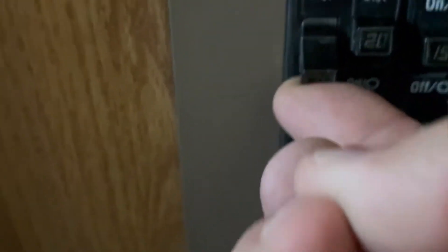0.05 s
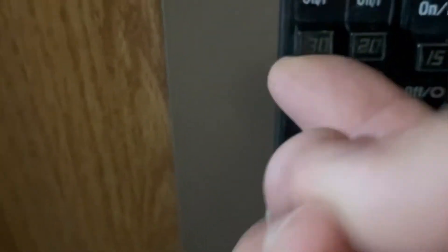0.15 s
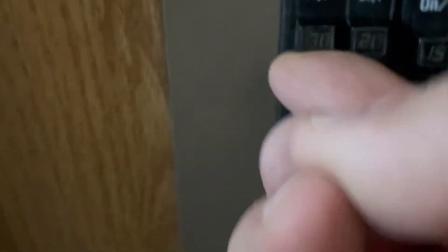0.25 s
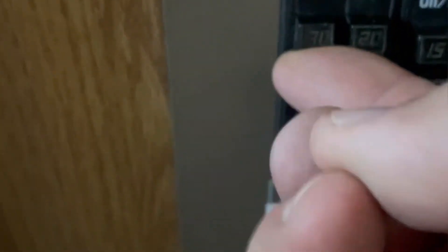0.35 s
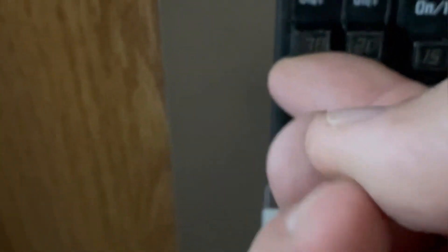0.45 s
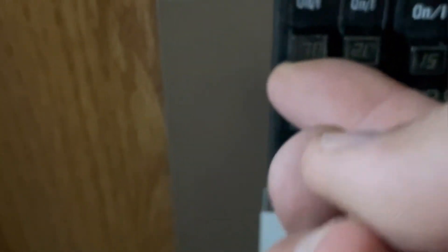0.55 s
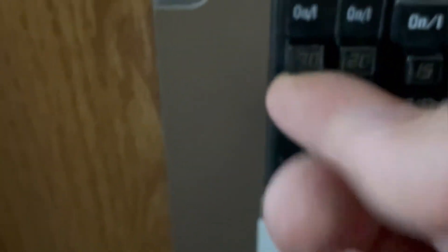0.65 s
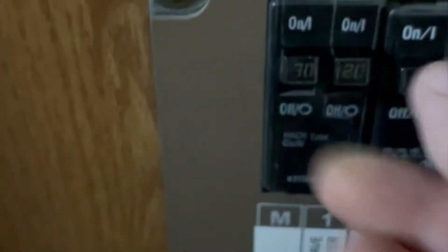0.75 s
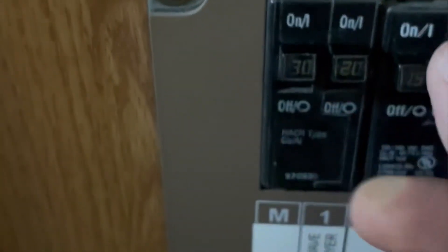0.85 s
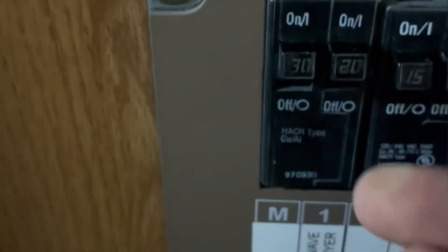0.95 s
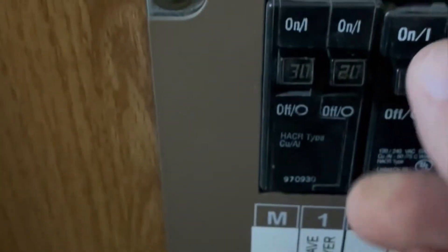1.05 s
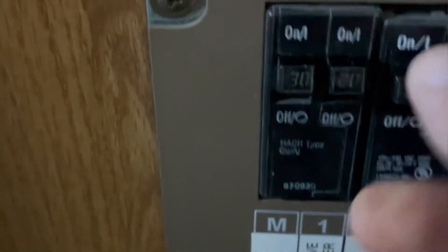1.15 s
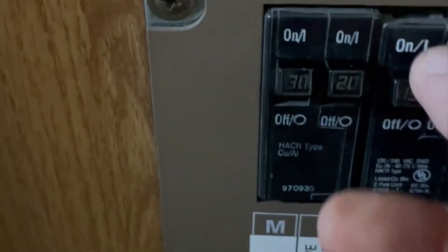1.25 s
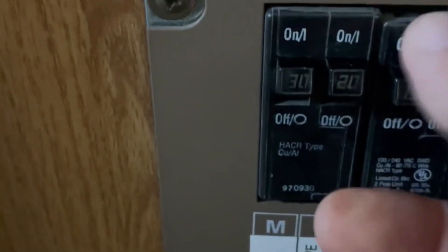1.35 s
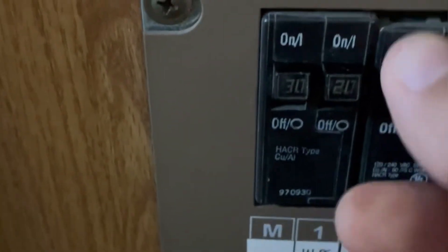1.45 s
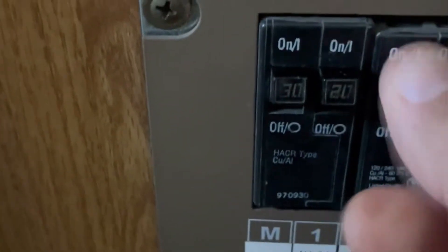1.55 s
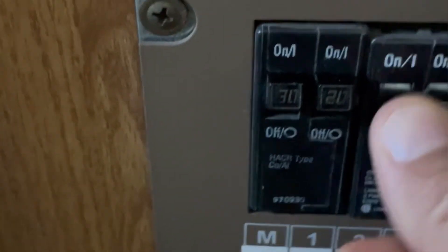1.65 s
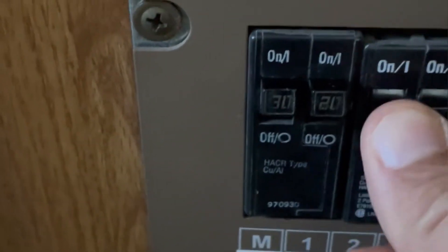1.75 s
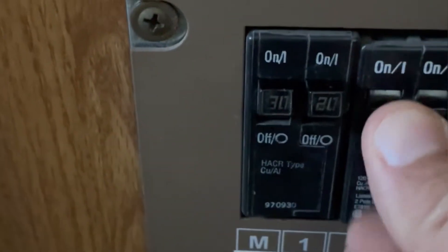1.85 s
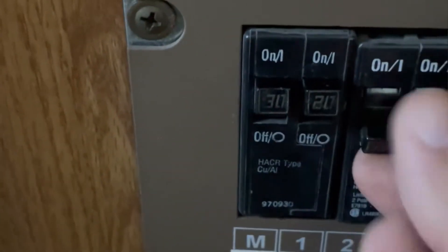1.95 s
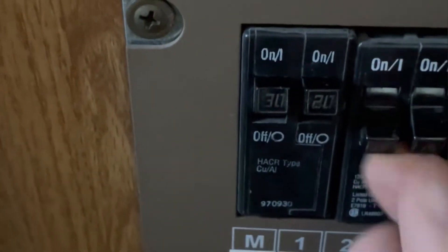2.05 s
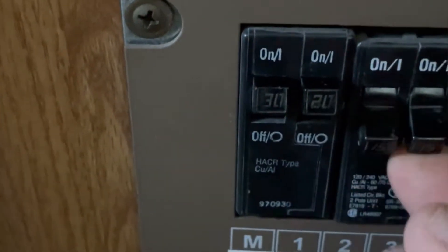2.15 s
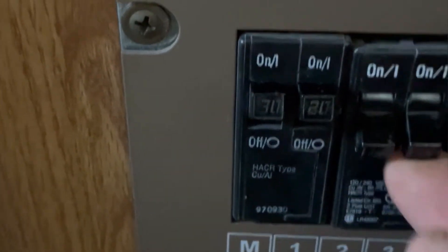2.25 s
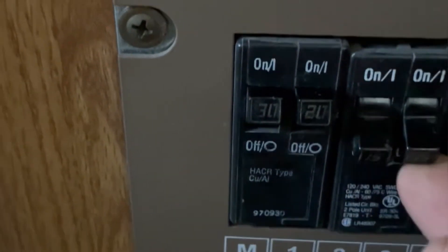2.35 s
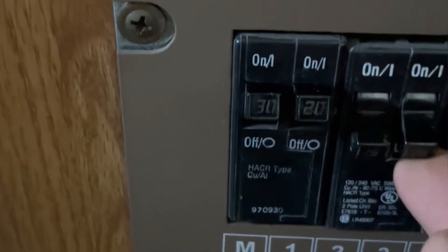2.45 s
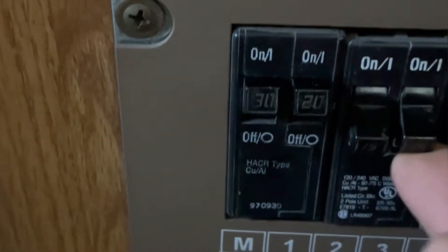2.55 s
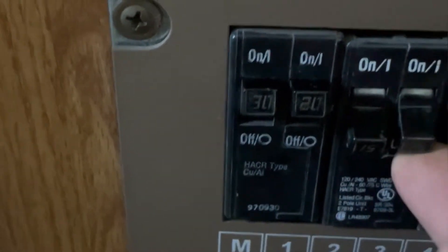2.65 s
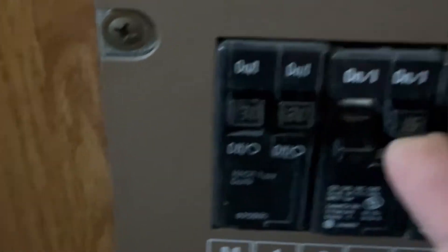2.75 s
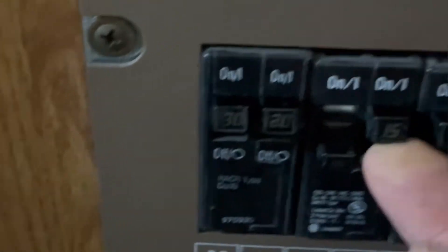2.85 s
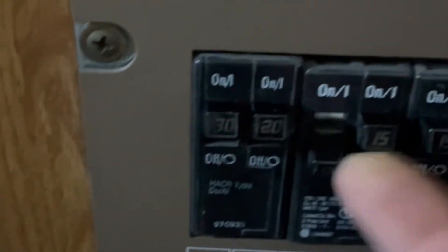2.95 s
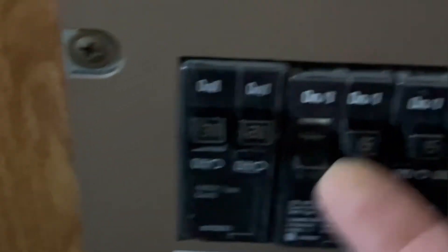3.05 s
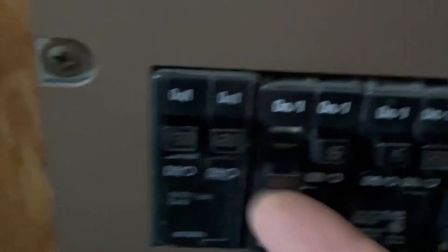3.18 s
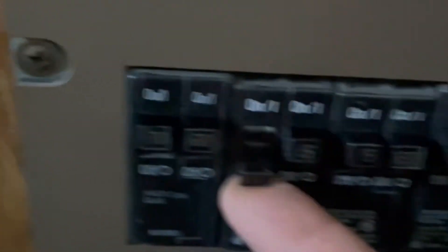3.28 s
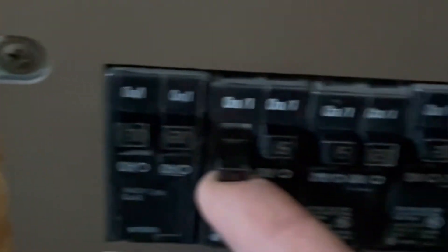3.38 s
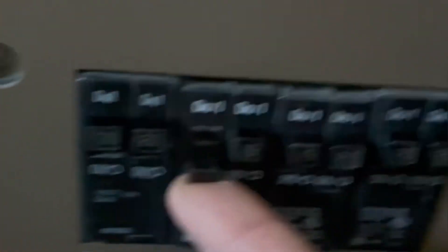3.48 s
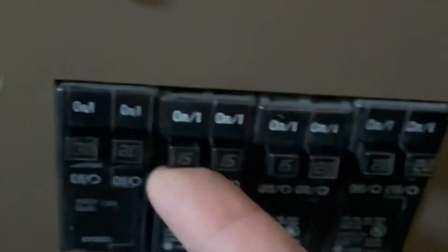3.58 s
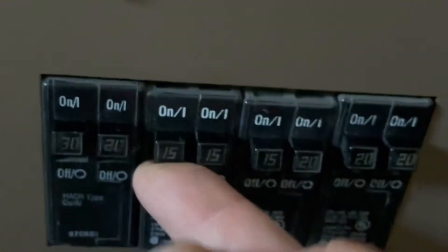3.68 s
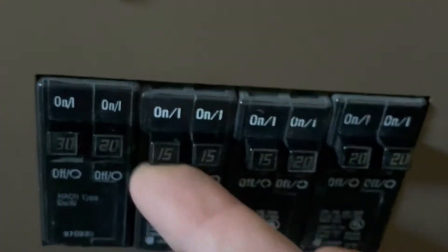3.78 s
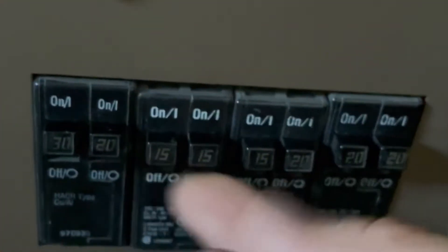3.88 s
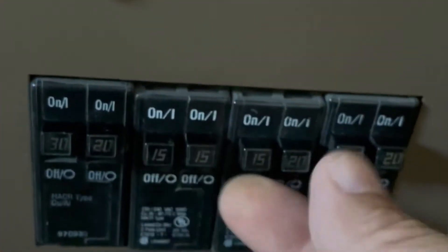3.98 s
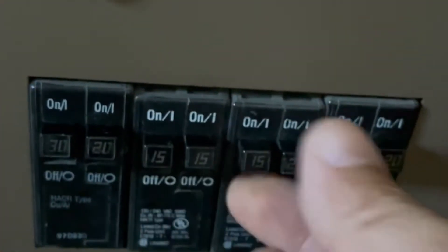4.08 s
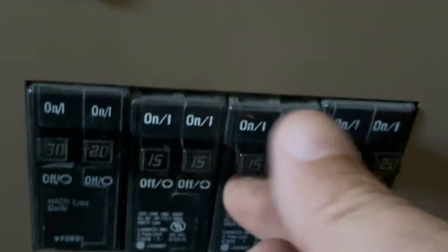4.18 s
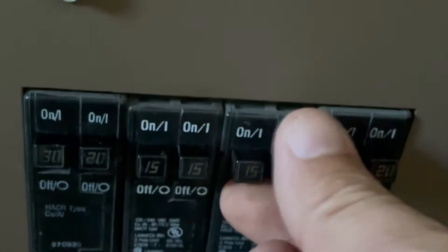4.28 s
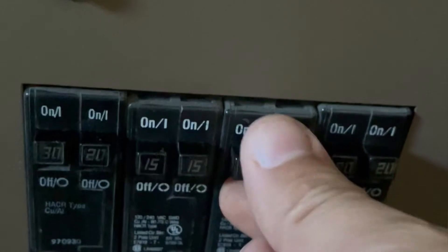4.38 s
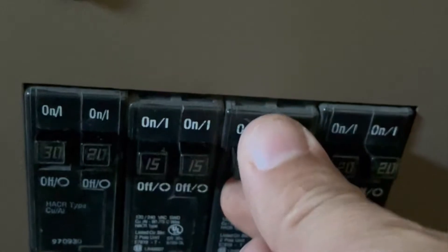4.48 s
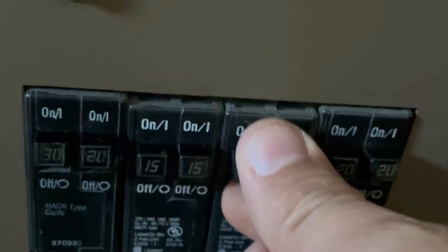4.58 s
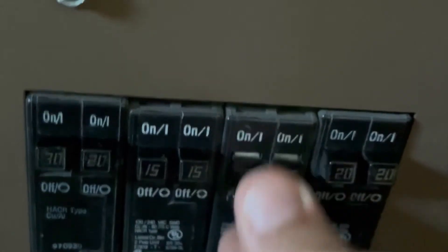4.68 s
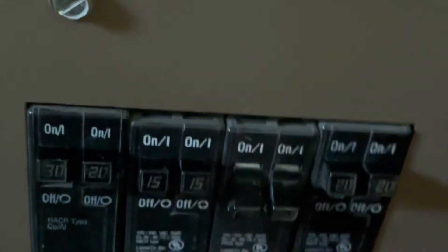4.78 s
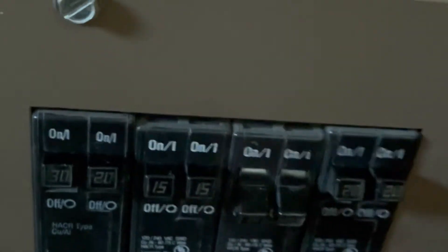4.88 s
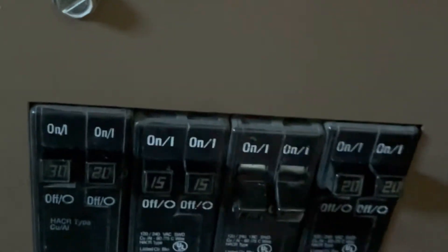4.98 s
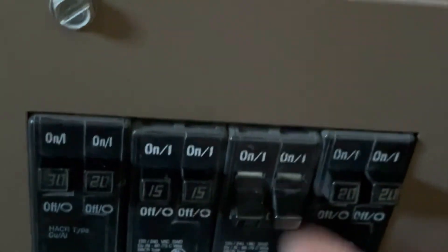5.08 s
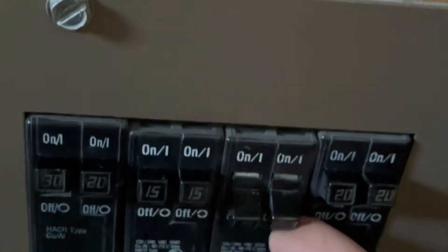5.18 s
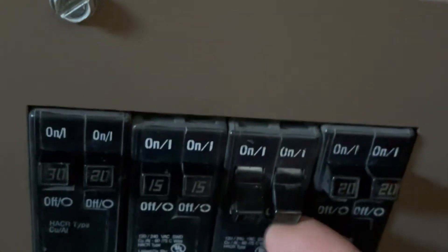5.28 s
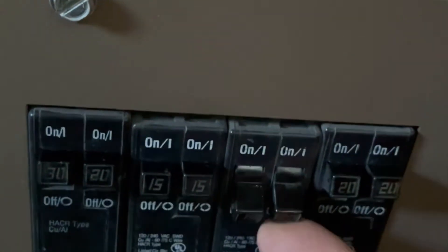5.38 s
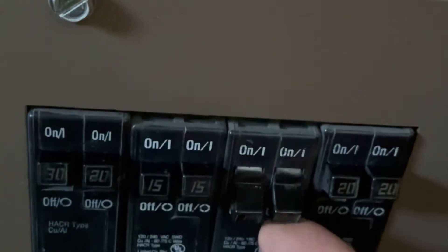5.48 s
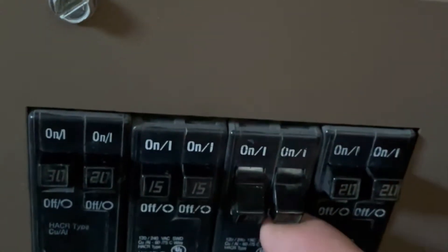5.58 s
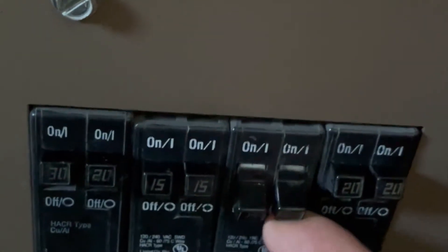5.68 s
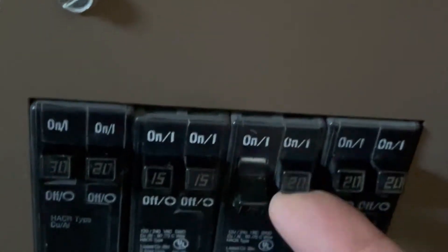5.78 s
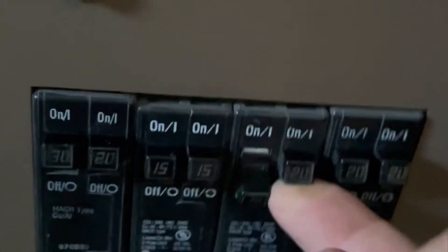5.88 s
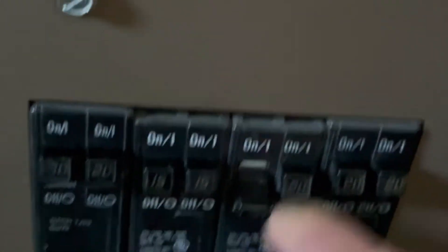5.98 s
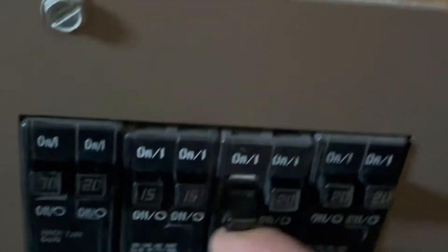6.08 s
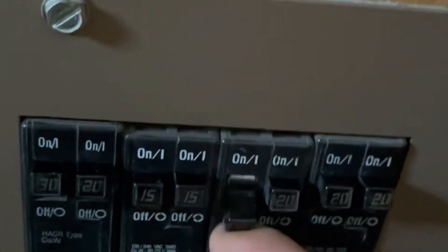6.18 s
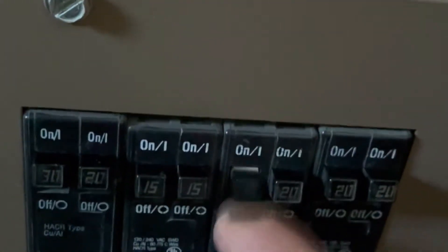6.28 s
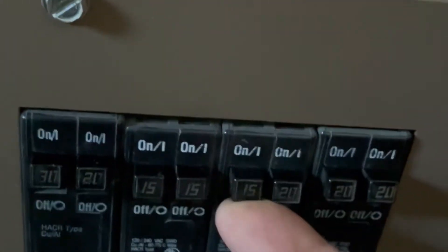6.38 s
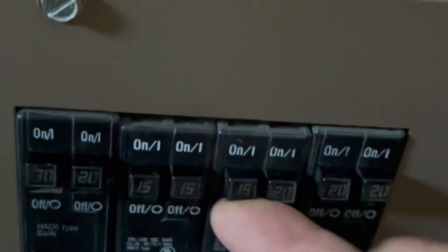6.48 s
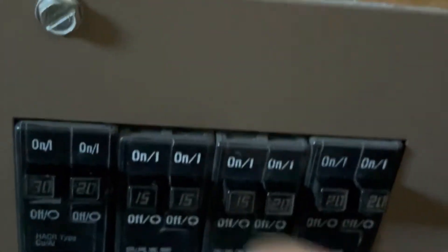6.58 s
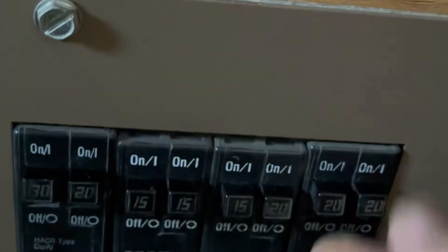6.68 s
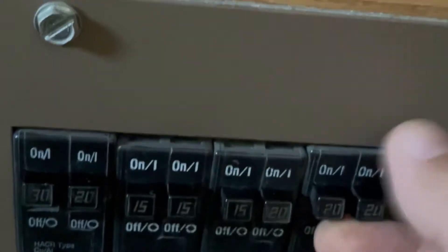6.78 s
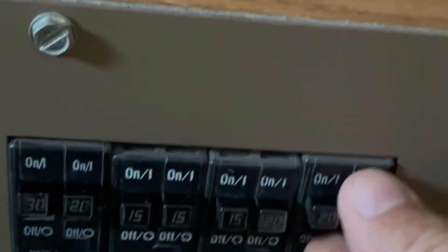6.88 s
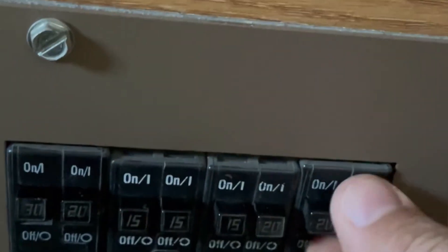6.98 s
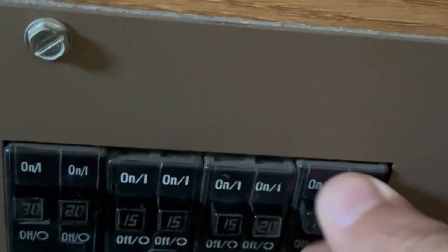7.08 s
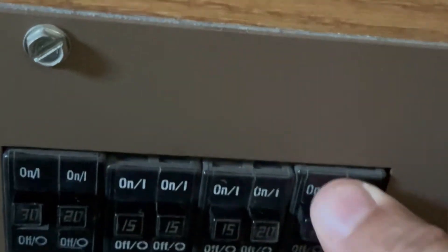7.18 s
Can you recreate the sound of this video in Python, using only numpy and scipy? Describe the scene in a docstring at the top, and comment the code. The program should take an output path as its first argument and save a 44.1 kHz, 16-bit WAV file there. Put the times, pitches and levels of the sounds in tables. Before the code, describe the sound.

A thumb flips circuit breakers in a wall panel, eight snaps about a second apart. Each is a sharp plastic click with a dull thump from the panel and a thin, brief ring of springs. Between snaps the thumb softly knocks, presses and rubs on the levers. The microphone is very close, in a small quiet cabin with a short echo and faint low air noise.

```python
"""Circuit breakers snap under a thumb in the wall panel of a small quiet cabin, a hand's width away.
Each snap is a latch tick and two hard contacts within about 10 ms; the plastic casing rings,
springs ring on thinly and the panel thumps. Between snaps the thumb knocks, presses and rubs
on panel and levers; sharper knocks slap drily. A short echo and faint air lie behind, in stereo."""
import sys
import numpy as np
from scipy import signal
from scipy.fft import rfft, irfft, next_fast_len
from scipy.io import wavfile
from scipy.ndimage import uniform_filter1d

SR = 44100
rng = np.random.default_rng(int(sys.argv[2]) if len(sys.argv) > 2 else 0)


def wrap_up_sound(samples):
    """Save the sound to the file named by the first command line argument, as 16-bit audio."""
    columns = np.atleast_2d(samples).T
    # keep every value between -1 and 1, then stretch to whole-number steps
    tamed = np.clip(columns, -1, 1)
    steps = np.round(tamed * 32767).astype(np.int16)
    wavfile.write(sys.argv[1], SR, steps)


N = 319284
FFT_SIZE = next_fast_len(N + 4096)

# Thrown levers: start_s, level_db, treble_db, latch_db, second_offset_s, second_db,
# thump_db, boom_under_88hz_db, boom_88_130hz_db
SNAPS = [(0.1113, -15, 4, -24.5, .0035, -23, -27, -36.5, -24.5),
         (1.5432, -10.5, 2.5, -25.5, -.006, -22.5, -26.5, -27.5, -25.5),
         (2.6531, -14, 5.5, -27.5, .0026, -16, -25, -34, -24),
         (3.5367, -13.5, 6, -31, -0.0079, -37, -25, -44, -35),
         (4.63, -8.5, 4.5, -26, -.0042, -20, -22, -20.5, -28.5),
         (5.705, -14.5, 5, -35.5, .0047, -15, -25, -39, -31),
         (6.282, -15, 2.5, -27.5, -.003, -31, -23, -39.5, -35.5),
         (7.2393, -12, 4.5, -29, -.0028, -23.5, -38, -47, -49)]
# Ticks of nail and loose levers: start_s, level_db, treble_db
TICKS = [(1.41, -54.5, -16), (1.427, -47.5, -8), (2.424, -50.5, -12.5), (3.775, -55, 1), (4.35, -51, -3),
         (4.5797, -40, 9.5), (4.6142, -31, 5), (4.7145, -27.5, -1), (5.562, -52, -7.5), (6.166, -39, -18),
         (7.08, -48.5, -5.5)]
def contact_rows():
    """Latch slips, main and second contacts, ticks: start_s, level_db, treble_db (over the mids)."""
    start_s, level_db, treble_db, latch_db, offset_s, second_db = np.transpose(SNAPS)[:6]
    latch_lead_s, latch_treble_db = .0075, -25.5
    latch = [start_s - latch_lead_s, latch_db, np.full_like(start_s, latch_treble_db)]
    main = [start_s, level_db, treble_db]
    second = [start_s + offset_s, second_db, treble_db + 4.5 * np.sign(offset_s)]  # the later of the two contacts is brighter, the earlier duller
    return np.hstack([latch, main, second, np.transpose(TICKS)])


# Latch slip spectrum: pitch_hz, level_db
LATCH_SPECTRUM = [(1500, -22.5), (2300, -11.5), (3500, -11), (4500, -8), (5000, 7.5), (5600, -11),
                  (7500, -18.5), (10000, -32.5)]
# Contact midrange spectrum: pitch_hz, level_db
MID_SPECTRUM = [(300, -27.5), (800, -6.5), (1600, -12), (2500, -9.5), (4000, -5.5), (6000, -3), (7500, -1),
                (9500, -29)]
# Contact treble spectrum: pitch_hz, level_db
CRACK_SPECTRUM = [(5500, -28), (7500, 0), (9000, 0.5), (11000, -2.5), (13500, -3.5), (15500, -11.5),
                  (17000, -24.5)]
def contacts():
    """Hard contacts give spiky millisecond bursts; returns near sound and stereo echo."""
    start_s, level_db, treble_db = contact_rows()
    treble_share = 1 / (1 + amp(-2 * treble_db))
    is_latch = treble_db < -19
    bands = ((LATCH_SPECTRUM, is_latch, .024, -27.5),
             (MID_SPECTRUM, (1 - treble_share) * ~is_latch, .024, -30),
             (CRACK_SPECTRUM, treble_share, .016, -35.5))
    near, echo = casing_ring(start_s, level_db, treble_db), 0
    for spectrum, power_share, t60_s, echo_db in bands:
        hits = impulses(start_s, amp(level_db + 3) * np.sqrt(power_share))
        rattle = amp(3.8 * drift(3400) - 3)  # metal rattles unevenly from cycle to cycle
        envelope = signal.lfilter([.15], [1, -.85], decay(hits, t60_s) * rattle)  # rounded attack
        near = near + colour(envelope * rng.standard_normal(N), spectrum)
        echo = echo + cabin_echo(hits, spectrum, echo_db)
    return casing_resonance(near), echo


def casing_ring(start_s, level_db, treble_db):
    """Each contact strikes the casing's close modes unevenly; high modes die sooner."""
    count = 60
    pitches_hz = np.geomspace(2100, 14500, count) * rng.uniform(.985, 1.015, count)
    coupling = rng.standard_normal((len(start_s), count))
    out = 0
    for k, hz in enumerate(pitches_hz):
        tilt_db = np.minimum(.7 * treble_db * np.log2(hz / 6000), 3)  # bright contacts favour high modes
        strikes = impulses(start_s, amp(level_db - 27 + tilt_db) * coupling[:, k])
        out = out + ring(strikes, hz, t60_s=.048 * (6000 / hz) ** .25)
    return out


# Casing resonances: pitch_hz, width_hz, lift_db
CASING_PEAKS = [(2300, 160, 7), (3150, 130, 6), (4540, 610, 1.5), (6330, 1400, 1.5), (7970, 2200, 2),
                (13400, 9300, 5.5)]
def casing_resonance(x):
    """The plastic casing lifts a few broad bands."""
    out = x
    for hz, width_hz, lift_db in CASING_PEAKS:
        r, w = np.exp(-np.pi * width_hz / SR), 2 * np.pi * hz / SR
        band = signal.lfilter([1 - r * r, 0, r * r - 1], [2, -4 * r * np.cos(w), 2 * r * r], x)
        out = out + (amp(lift_db) - 1) * band
    return out


# Springs, blades and cover plate per pole: start_s, touch_s, modes (pitch_hz, level_db, t60_s)
SPRING_MODES = [ (.1115, .5, [(807, -45, .35), (1487, -57, .4), (6487, -61, .9), (6712, -58, .7),
                (7772, -63, .6), (9652, -58, .65), (9787, -59, .6), (10310, -58, .6), (11100, -62, .7),
                (11312, -61, .75)]), (1.5437, 1.95, [(802, -53, .35), (1454, -38, .15), (1496, -60, .6),
                (2439, -60, .3), (5856, -57, .45), (6350, -64, .7), (7602, -61, .75), (9539, -59, .75),
                (10004, -57, .75), (10506, -56, .85), (11447, -62, .75)]), (2.6529, 3.04, [(797, -41, .35),
                (1522, -65, .7), (6260, -54, .8), (6652, -36, .16), (7437, -55, .75), (7735, -45, .7),
                (9089, -58, .7), (9210, -57, .6), (9670, -56, .55), (11093, -51, .35)]),
                (3.5342, 3.79, [(803, -43, .45), (1497, -61, .55), (6262, -62, .8), (6645, -45, .47),
                (7393, -35, .16), (7737, -49, .45), (7887, -50, .4), (9204, -53, .6), (10610, -56, .6),
                (11095, -56, .65)]), (4.7136, 4.93, [(802, -58, .4), (1500, -64, .7), (6308, -64, .65),
                (8097, -66, .6), (9404, -57, .6), (9579, -58, .55), (9929, -62, .65), (10570, -63, .75),
                (11445, -64, .75)]), (5.7072, 6.04, [(807, -52, .4), (1527, -45, .38), (6754, -57, .75),
                (6912, -53, .4), (7008, -53, .33), (7510, -62, .7), (9979, -63, .7), (10695, -59, .75),
                (11533, -61, .65)]), (6.2822, 6.5, [(764, -48, .38), (1525, -54, .38), (5883, -35, .11),
                (6687, -56, .5), (6935, -49, .45), (7839, -59, .85), (9506, -61, .6), (9891, -56, .52),
                (10631, -64, .7)]), ]
def springs():
    """Thrown poles ring on in beating mode pairs until a touch damps them."""
    damping_db_per_s = 120
    out, t = np.zeros(N + SR), np.arange(SR) / SR
    click = impulses([0], 1)[:SR]
    for start_s, touch_s, modes in SPRING_MODES:
        splits_hz = rng.uniform(2.4, 52, len(modes))
        pairs = sum(amp(db) * (ring(click, hz, t60_s) + .5 * ring(click, hz + split_hz, t60_s))
                    for (hz, db, t60_s), split_hz in zip(modes, splits_hz))
        damping = amp(-damping_db_per_s * np.maximum(start_s + t - touch_s, 0))
        out[int(start_s * SR):][:SR] += pairs * damping
    return out[:N] * amp(.24 + drift(30))  # loose parts rattle unevenly


# Thumb knocks: start_s, mid_130_450hz_db, bass_under_130hz_db, high_450_1300hz_db
KNOCKS = [(0.043, -54, -58.5, -54), (0.237, -55.5, -56.5, -61), (0.297, -51, -54.5, -53.5),
          (0.429, -56, -55.5, -54.5), (0.653, -52.5, -50, -64.5), (1.021, -47, -65.5, -48.5),
          (1.044, -40.5, -49, -54), (1.146, -62, -66.5, -87), (1.296, -54, -56, -74),
          (1.37, -34, -38, -31.5), (1.414, -35.5, -46.5, -35), (1.719, -59, -56.5, -72),
          (1.861, -38, -45.5, -53.5), (1.923, -46, -50, -54.5), (1.941, -40, -43.5, -81),
          (2.049, -63.5, -57.5, -61), (2.134, -52, -59, -65.5), (2.406, -41, -61, -55),
          (2.425, -33.5, -41, -37), (2.541, -48.5, -71, -58), (2.735, -44.5, -50.5, -58),
          (2.898, -38.5, -65, -64.5), (2.924, -40, -36.5, -43.5), (2.947, -30.5, -37.5, -38),
          (3.04, -45.5, -48, -62), (3.068, -56.5, -56, -56), (3.117, -51.5, -58.5, -53.5),
          (3.146, -55.5, -52.5, -48), (3.18, -62, -42.5, -53), (3.203, -40, -38.5, -38),
          (3.255, -38.5, -49.5, -45), (3.277, -32, -43, -45.5), (3.351, -48.5, -68, -53),
          (3.389, -46.5, -63, -49.5), (3.509, -43, -63, -44), (3.731, -44, -43.5, -58.5),
          (3.779, -42.5, -37, -53.5), (4.221, -63.5, -63, -62), (4.342, -46, -54.5, -50.5),
          (4.581, -44, -52, -37), (4.715, -34.5, -28.5, -42), (4.762, -41, -36.5, -50),
          (4.871, -42.5, -49, -45), (4.898, -49.5, -47, -67), (4.94, -56.5, -48, -60.5),
          (5.143, -59, -50, -79), (5.542, -49.5, -55, -56.5), (5.563, -31, -37.5, -40.5),
          (5.606, -39, -44.5, -51), (5.91, -43.5, -44, -49), (5.967, -52, -46.5, -76),
          (6.139, -60, -57, -60.5), (6.167, -30, -46.5, -41), (6.458, -48, -55, -58),
          (6.499, -37.5, -53, -55), (6.565, -60, -49.5, -84), (6.857, -42, -55, -45),
          (7.084, -45.5, -50.5, -44), (7.172, -40, -58, -51)]
def blow_rows():
    """Snap thumps and knocks on the panel: start_s, deep_db, low_db, mid_db, high_db."""
    snap_s, *_, thump_db, deep_db, low_db = np.transpose(SNAPS)
    knock_s, mid_db, bass_db, high_db = np.transpose(KNOCKS)
    thump_lag_s = .0015
    thumps = [snap_s + thump_lag_s, deep_db, low_db, thump_db, thump_db + .5]
    return np.hstack([thumps, [knock_s, bass_db, bass_db, mid_db, high_db]])


# Wall panel and cover plate modes: pitch_hz, level_db, t60_s
PANEL_MODES = [(59, -13.5, 0.083), (75, -7, 0.95), (84.88, -4, 0.71), (100.05, 0, 0.33), (106.8, 0, 0.3),
               (146.8, -5, 0.22), (165.8, -3.5, 0.2), (205.5, -7.5, 0.18), (252, -7, 0.064),
               (268.5, -6.5, 0.093), (314.6, -6, 0.14), (358, -8, 0.22), (439, -14.5, .1),
               (496, -11.5, 0.1), (550, -7.5, 0.12), (601.5, -7, 0.099), (675, -7, 0.064),
               (753, -5.5, 0.09), (808, -9, 0.18), (904, -8.5, 0.064), (1082, -14, 0.1), (1184, -11, 0.091)]
def panel_thumps(start_s, bands_db):
    """Soft blows ring the panel; each lands elsewhere and weights the modes differently."""
    band_edges_hz = [88, 130, 450]
    scatter = rng.standard_normal((len(start_s), len(PANEL_MODES), 2))
    out = 0
    for k, (hz, mode_db, t60_s) in enumerate(PANEL_MODES):
        blow_db = bands_db[np.searchsorted(band_edges_hz, hz)]
        sign = 1 if hz < 130 else np.sign(scatter[:, k, 1])  # deep modes start inwards together
        blows = impulses(start_s, amp(blow_db + mode_db + 4.2 * scatter[:, k, 0]) * sign)
        pulse = np.hanning(int(SR / hz * .99) + 3)  # about one cycle, so lows swell later
        force = signal.oaconvolve(blows, pulse / pulse.sum())[:N]
        out = out + ring(force, hz, t60_s)
    return out


# Thumb leaning on the panel: start_s, end_s, level_db
LEANS = [(0.026, 0.314, -45), (1.535, 1.72, -48), (1.904, 1.962, -45.5), (2.72, 3.037, -46),
         (3.176, 3.22, -50.5), (3.57, 3.816, -46.5), (4.75, 4.86, -40), (4.999, 5.193, -55),
         (5.748, 5.837, -40.5), (6.05, 6.25, -56), (6.324, 6.505, -40.5), (7.14, 7.301, -58)]
def thumb_pressure():
    """Uneven pressure makes the panel modes rumble; each lean swells, holds and fades."""
    rise_db_per_s, fall_db_per_s, rest_db, tilt_db_per_octave = 199, 137, -80.5, -17
    push = rng.standard_normal(N) * amp(4.5 * drift(21))
    rumble = sum(ring(push, hz, .57 * t60_s) * amp(db + tilt_db_per_octave * np.log2(hz / 60))
                 for hz, db, t60_s in PANEL_MODES)
    t, weight = np.arange(N) / SR, amp(rest_db)
    for start_s, end_s, level_db in LEANS:
        drop_db = rise_db_per_s * np.maximum(start_s - t, 0) + fall_db_per_s * np.maximum(t - end_s, 0)
        weight = weight + amp(level_db - drop_db)
    return weight * rms_one(rumble)


# Dry slap of the sharper thumb knocks: start_s, level_db
KNOCK_SLAPS = [(0.298, -61), (0.426, -58.5), (1.019, -62.5), (1.861, -63), (2.945, -38.5), (3.204, -45),
               (3.276, -51.5), (3.51, -55), (3.777, -58.5), (5.563, -50), (5.606, -46.5), (5.908, -48.5),
               (6.137, -58), (6.166, -44), (6.498, -51), (7.083, -54)]
# Dry slap spectrum: pitch_hz, level_db
SLAP_SPECTRUM = [(900, -18), (1400, 1), (2300, -3.5), (3000, -14), (4200, -29.5)]
def slaps(blow_s, high_db):
    """Blows slap drily, hard ones disproportionately; the sharper thumb knocks get extra slap."""
    sharp_s, sharp_db = np.transpose(KNOCK_SLAPS)
    slap_db = -57.5 + 1.9 * (high_db + 40)
    hits = impulses(np.r_[blow_s, sharp_s], amp(np.r_[slap_db, sharp_db] - 10.5))
    return colour(decay(hits, t60_s=.073) * rng.standard_normal(N), SLAP_SPECTRUM)


# Cavity rattle spectrum: pitch_hz, level_db
CAVITY_SPECTRUM = [(120, -22), (200, 2.5), (400, -1.5), (700, -7.5), (1200, -16), (1800, -24.5),
                   (2500, -40)]
def cavity_rattle(blow_s, mid_db):
    """Blows set off a dense rattle in the hollow behind the panel."""
    hits = impulses(blow_s, amp(-69 + 1.6 * (mid_db + 40)))
    return colour(decay(hits, t60_s=.36) * rng.standard_normal(N), CAVITY_SPECTRUM)


# Skin scuffs on plastic: start_s, length_s, low_db, high_db
SCUFFS = [(0.01, 0.02, -79, -76), (0.088, 0.052, -63.5, -83), (0.88, 0.047, -76.5, -80),
          (0.956, 0.054, -78.5, -73.5), (1.162, 0.049, -90, -79), (1.27, 0.056, -76, -76.5),
          (1.345, 0.025, -69, -73), (1.44, 0.21, -84, -104), (1.682, 0.1, -87, -73.5),
          (1.847, 0.1, -76, -77), (1.946, 0.1, -74.5, -76), (2.095, 0.038, -88, -80),
          (2.247, 0.06, -76, -97), (2.402, 0.083, -77.5, -85), (2.875, 0.014, -74.5, -84),
          (2.914, 0.049, -73.5, -98), (3.014, 0.048, -71, -101), (3.173, 0.026, -73.5, -71.5),
          (3.697, 0.018, -83, -78), (3.781, 0.045, -75.5, -82), (4.294, 0.055, -84, -75.5),
          (4.735, 0.12, -78.5, -88.5), (4.851, 0.09, -75, -76), (5.087, 0.022, -75.5, -89),
          (5.243, 0.076, -86, -96), (5.553, 0.074, -83.5, -80.5), (5.897, 0.069, -83.5, -91),
          (5.994, 0.084, -75.5, -97), (6.155, 0.056, -76, -94), (6.448, 0.027, -76, -77),
          (6.482, 0.06, -75.5, -72), (6.78, 0.04, -79.5, -80), (6.954, 0.13, -86, -86),
          (7.07, 0.048, -73.5, -82)]
# Skin friction spectrum, low band: pitch_hz, level_db
SKIN_LOW = [(1500, -30), (2400, -7), (3100, -15.5), (4150, -3), (4750, -13.5), (5450, -0.5), (6300, -9.5),
            (7900, -3), (9500, -19.5)]
# Skin friction spectrum, high band: pitch_hz, level_db
SKIN_HIGH = [(6500, -24), (8500, -4.5), (10500, -4), (12800, 0), (14500, -8.5), (16200, -36)]
def rubbing():
    """Sliding skin hisses grainily over faint constant brushing; the two bands wander apart."""
    start_s, length_s, low_db, high_db = np.transpose(SCUFFS)
    out, grain_db = 0, 2.6 * drift(70)
    for level_db, spectrum in ((low_db, SKIN_LOW), (high_db, SKIN_HIGH)):
        gate = np.cumsum(impulses(start_s, amp(level_db)) - impulses(start_s + length_s, amp(level_db)))
        scuffs = uniform_filter1d(uniform_filter1d(gate, size=600), size=600)
        brushing = amp(-97 + 2.6 * drift(5))
        out = out + (scuffs + brushing) * amp(grain_db + 2.6 * drift(25)) * noise(spectrum)[0]
    return casing_resonance(out)


def cabin_echo(hits, spectrum, gain_db):
    """The small cabin answers each contact with a short noise tail: mid and side channels."""
    return amp(gain_db + 2.3 * drift(80)) * decay(hits, t60_s=.18) * noise(spectrum, channels=2)


# Near air spectrum: pitch_hz, level_db
AIR_SPECTRUM = [(15, -34), (25, -11), (65, 4.5), (106, -6), (152, -3), (222, -14.5), (505, -28.5),
                (642, -30), (800, -23.5), (1080, -37), (1350, -32.5), (2010, -36), (3000, -35),
                (3900, -68.5), (6600, -120)]
# Faint hiss spectrum: pitch_hz, level_db
HISS_SPECTRUM = [(1500, -21), (2500, -8.5), (6000, -6), (9000, -8.5), (12500, -1.5), (14200, -5.5),
                 (15500, -42)]
def near_air():
    """A low rumble and a thin hiss, both slowly wavering."""
    rumble = amp(-71.5 + 2 * drift(1.6)) * noise(AIR_SPECTRUM)[0]
    hiss = amp(-84 + 1.6 * drift(3.6)) * noise(HISS_SPECTRUM)[0]
    return rumble + hiss


# Diffuse cabin noise spectrum: pitch_hz, level_db
DIFFUSE_SPECTRUM = [(60, -16.5), (180, 0.5), (320, -7.5), (800, -4.5), (1100, -9.5), (1700, -20),
                    (3000, -33.5), (16000, -43)]
def diffuse_air():
    """Faint room noise, independent in each channel."""
    return amp(-82 + 1.5 * drift(6)) * noise(DIFFUSE_SPECTRUM, channels=2)


# Phase between the microphone ports: pitch_hz, left_lead_rad
PORT_PHASE = [(100, 0), (350, -.3), (860, -.42), (1150, -.1), (2150, .35), (3000, .72), (3800, .5),
              (4750, 1.5), (5050, -.1), (5800, .6), (8600, 2.5), (10700, 3.3), (12100, 4.5), (14800, 6.05),
              (16500, 6.3)]
def microphone_ports(x):
    """Two ports hear a near source at equal level, with a pitch-dependent phase between them."""
    half_turn = np.exp(.5j * at_bins(PORT_PHASE))
    return irfft(rfft(x, FFT_SIZE) * np.array([half_turn, 1 / half_turn]), FFT_SIZE)[:, :N]


def amp(db):
    return 10 ** (np.asarray(db) / 20)


def rms_one(x):
    return x / np.sqrt(np.mean(x ** 2) + 1e-20)


def at_bins(curve):
    """A (pitch_hz, value) curve at the FFT bins, interpolated in log pitch."""
    hz, values = np.transpose(curve)
    return np.interp(np.log(np.fft.rfftfreq(FFT_SIZE, 1 / SR) + 1), np.log(hz + 1), values)


def colour(x, spectrum):
    """Spectral shaping that keeps the rms of white noise."""
    return irfft(rfft(x, FFT_SIZE) * rms_one(amp(at_bins(spectrum))), FFT_SIZE)[..., :N]


def noise(spectrum, channels=1):
    """Steady coloured noise, rms 1."""
    return colour(rng.standard_normal((channels, N)), spectrum)


def impulses(times_s, sizes):
    out = np.full(N, 1e-18)
    np.add.at(out, np.minimum((np.asarray(times_s) * SR).astype(int), N - 1), sizes)
    return out


def decay(hits, t60_s):
    """Each impulse becomes a step that dies away."""
    return signal.lfilter([1], [1, -amp(-60 / (t60_s * SR))], hits)


def ring(force, hz, t60_s):
    """One mode: a unit impulse starts a decaying sine of height 1."""
    r, w = amp(-60 / (t60_s * SR)), 2 * np.pi * hz / SR
    return signal.lfilter([0, np.sin(w)], [1, -2 * r * np.cos(w), r * r], force)


def drift(rate_hz):
    """Smooth random wander, rms 1."""
    r = np.exp(-2 * np.pi * rate_hz / SR)
    return rms_one(signal.lfilter([1], [1, -2 * r, r * r], rng.standard_normal(N + SR))[SR:])


def scene():
    """Breakers, panel and thumb close by, with cabin echo and air."""
    snaps, (echo_mid, echo_side) = contacts()
    blow_s, deep_db, low_db, mid_db, high_db = blow_rows()
    near = snaps + near_air() + springs()
    near += panel_thumps(blow_s, (deep_db, low_db, mid_db, high_db)) + thumb_pressure()
    near += slaps(blow_s, high_db) + cavity_rattle(blow_s, mid_db) + rubbing()
    return microphone_ports(near + echo_mid) + amp(-8) * echo_side * [[1], [-1]] + diffuse_air()


def record(dry):
    """The microphone drops the deepest bass, rounds peaks and cuts the top."""
    low_cut_hz, high_cut_hz, ceiling = 54, 16900, .85
    thin = signal.sosfilt(signal.butter(4, low_cut_hz, "high", fs=SR, output="sos"), dry)
    rounded = ceiling * np.tanh(thin / ceiling)
    return signal.sosfilt(signal.cheby2(12, 70, high_cut_hz, fs=SR, output="sos"), rounded)


dry = scene()
out = record(dry)
wrap_up_sound(out)
```